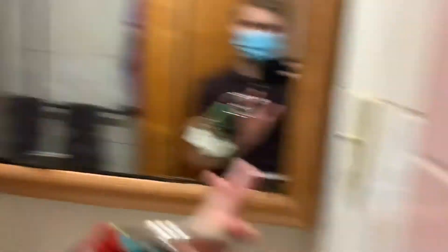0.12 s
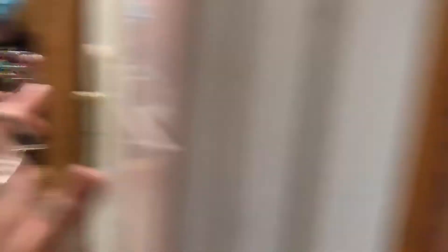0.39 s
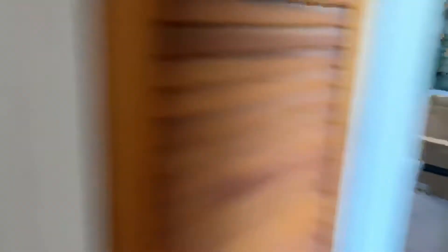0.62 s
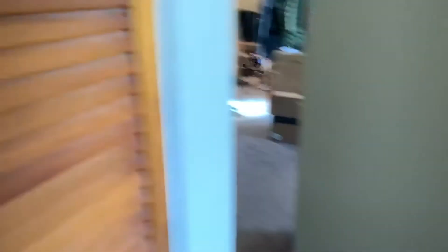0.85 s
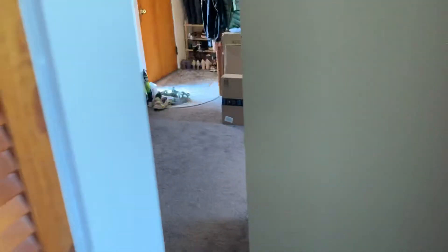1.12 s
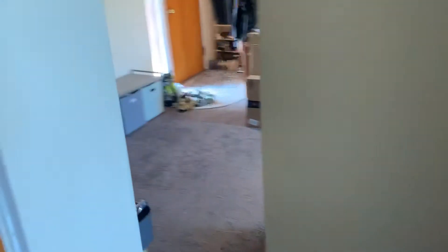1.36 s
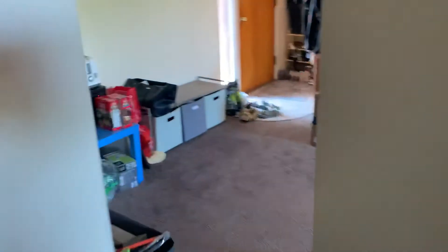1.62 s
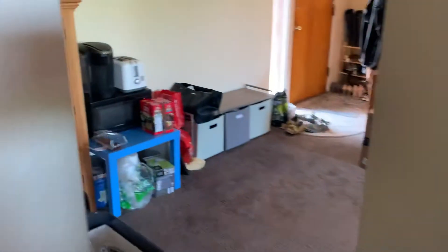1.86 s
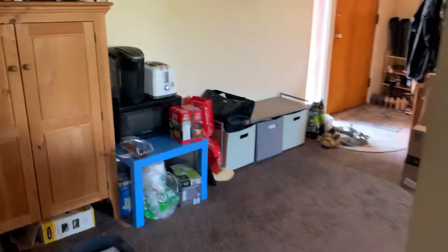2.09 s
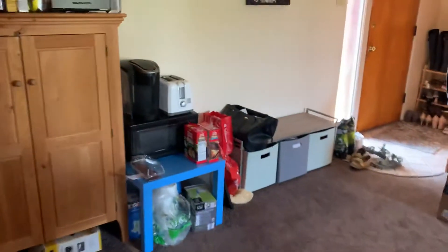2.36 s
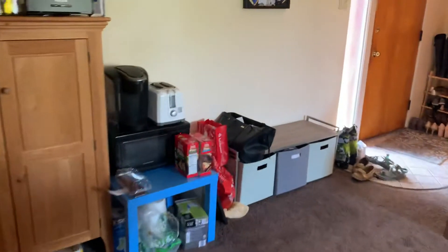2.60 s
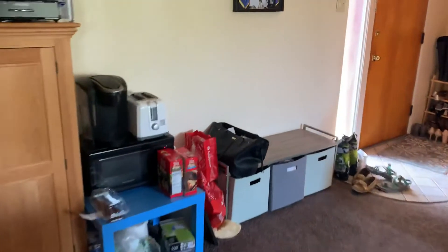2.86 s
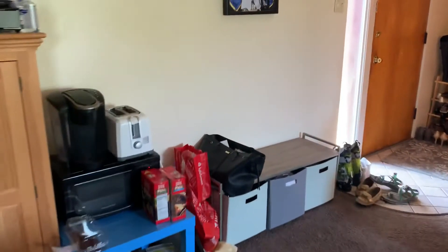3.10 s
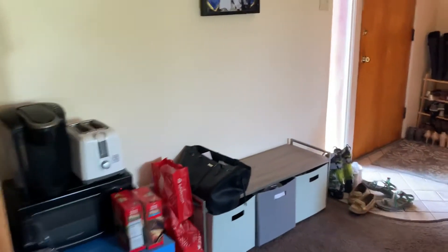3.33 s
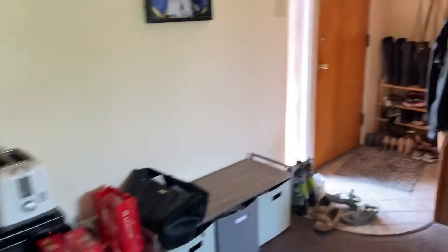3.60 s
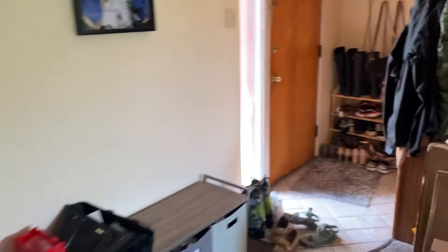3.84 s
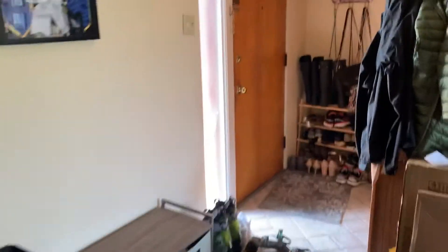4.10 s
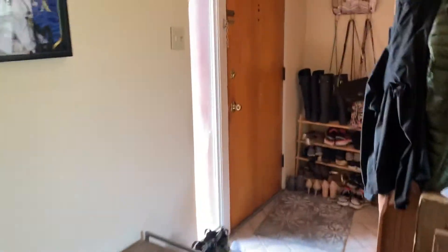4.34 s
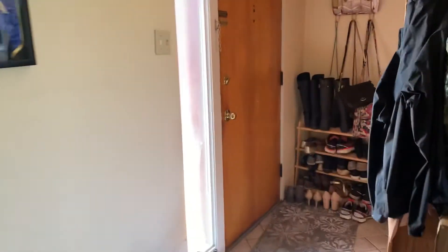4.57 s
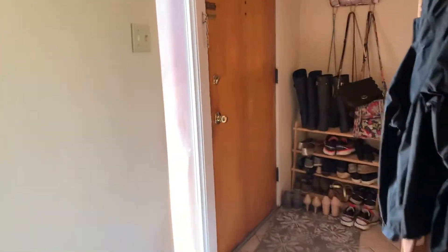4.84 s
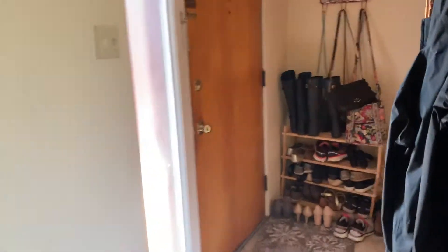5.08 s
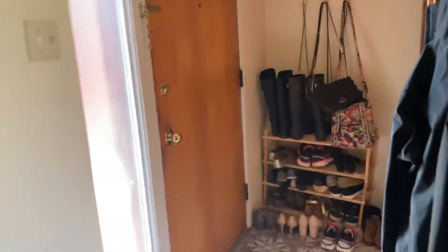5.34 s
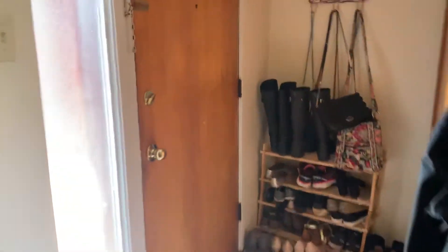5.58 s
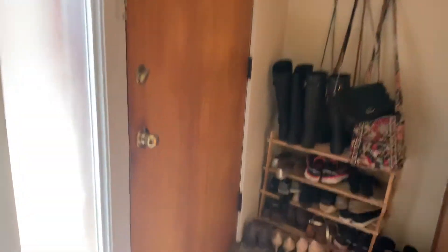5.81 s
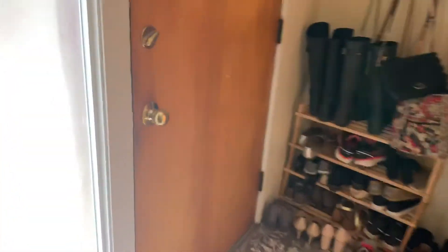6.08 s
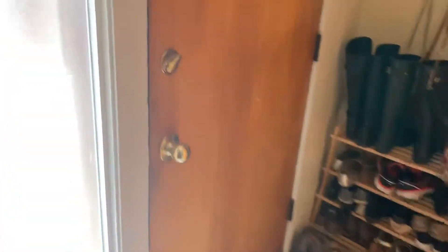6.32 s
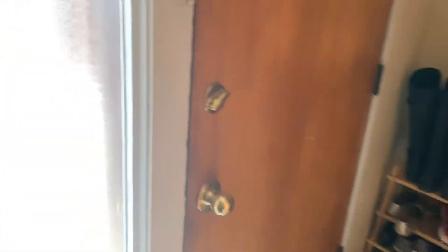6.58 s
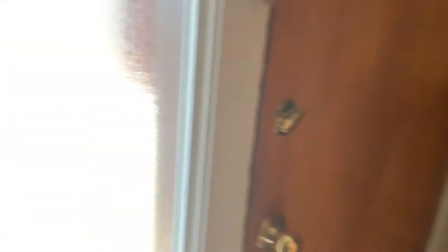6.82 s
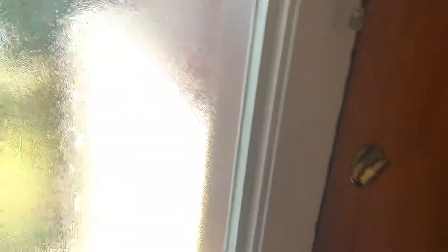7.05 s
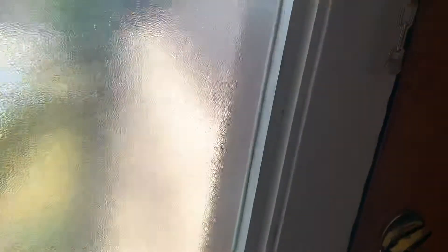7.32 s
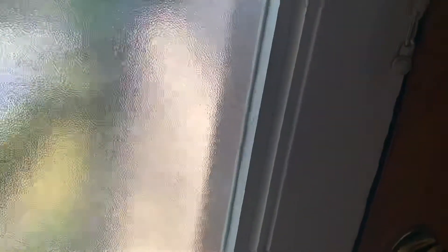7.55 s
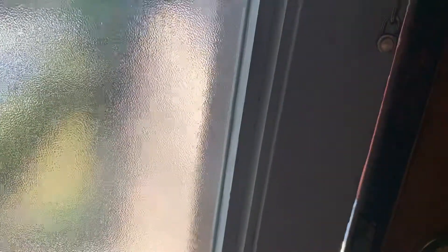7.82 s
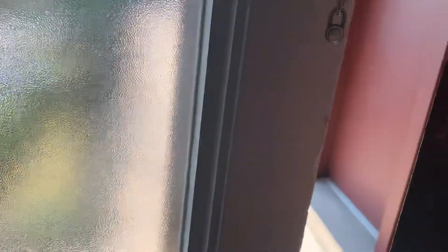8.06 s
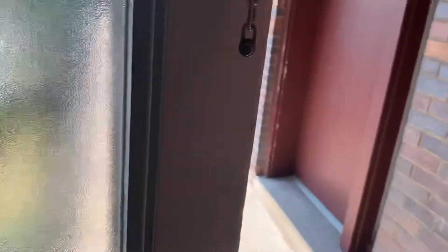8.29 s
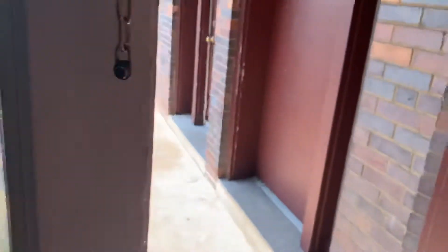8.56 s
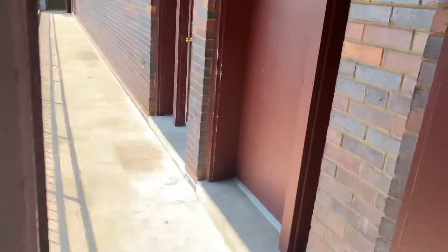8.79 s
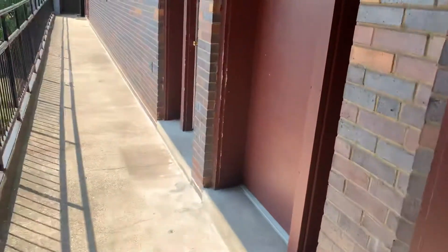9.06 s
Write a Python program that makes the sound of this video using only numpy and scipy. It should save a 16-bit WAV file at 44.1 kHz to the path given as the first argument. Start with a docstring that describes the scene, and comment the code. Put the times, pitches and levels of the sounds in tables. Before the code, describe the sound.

Someone carries keys through a small carpeted flat with short echoes. Thin, high clinks come thickly at first, with cloth crackle, loose shoe slaps and muffled steps over a low hum. Midway comes a loud, boomy bump on the phone, then finger rubs. The keys thin out; dull lock clacks, a brief door shudder and squeaky scrape lead to street noise outside and a last sharp slap.

```python
"""A bunch of keys clinks as someone carries it and a phone through a humming flat and opens the front door.
Keys are short ringing modes; clothes rustle as crackling noise; a finger knocks and rubs the phone's case.
Loose shoes slap as tinted noise bursts, and soles press softly into carpet over a low rumble. The lock clacks
as dull rings, the door shudders on a low tone and its seal scrapes. Last come street noise and a machine's tones."""
import sys
import numpy as np
from scipy import signal
from scipy.fft import rfft, irfft, next_fast_len
from scipy.io import wavfile
from scipy.ndimage import uniform_filter1d

SR = 44100
rng = np.random.default_rng(int(sys.argv[2]) if len(sys.argv) > 2 else 0)


def store_pcm(level_fs):
    """Save levels as 16-bit WAV."""
    pcm = np.round(np.clip(level_fs, -1, 1) * 32767).astype(np.int16)
    wavfile.write(sys.argv[1], SR, np.atleast_2d(pcm).T)


def voltage_ratio(level):
    """Linear amplitude factor for a level in decibels (scalar or array-like)."""
    return 10 ** (np.asarray(level, float) / 20)


N = 404397  # length in samples


def evened(x):
    """Scales a sound to rms 1, so that its level can be set afterwards."""
    return x / np.sqrt(np.mean(x ** 2) + 1e-20)


def read(points, hz):
    """Reads a table between its rows, with frequency on a log axis."""
    f, value = np.transpose(points)
    return np.interp(np.log(hz + 1), np.log(f + 1), value)


def level(rows, column=1):
    """Gain along a curve of dB over time, falling off just beyond its ends."""
    s, db = np.transpose(rows)[[0, column]]
    edge_s = 0.015
    times = [s[0] - edge_s, *s, s[-1] + edge_s]
    levels = [db[0] - 15, *db, db[-1] - 38]
    return voltage_ratio(np.interp(np.arange(N) / SR, times, levels, -200, -200))


def strokes(rows, rise_db_per_s, fall_db_per_s, column=2):
    """Gain of a row of gestures: each rises to its start, holds for its length and falls away."""
    start, length, db = np.transpose(rows)[[0, 1, column], :, None]
    t = np.arange(0, N + 64, 32) / SR  # a coarse clock is enough for the gain
    rise = (start - t) * rise_db_per_s
    fall = (t - start - length) * fall_db_per_s
    under_db = np.maximum(np.maximum(rise, fall), 0)
    total = np.sqrt((voltage_ratio(db - under_db) ** 2).sum(0))
    return np.interp(np.arange(N) / SR, t, total)


def add(mix, s, sound):
    """Lays a sound into the mix at s seconds."""
    part = mix[..., round(s * SR):][..., :sound.shape[-1]]
    part += sound[..., :part.shape[-1]]


def colour(x, db_at):
    """Filters a sound by a function that gives dB at each frequency."""
    size = next_fast_len(x.shape[-1] + 2048)
    gain = voltage_ratio(db_at(np.fft.rfftfreq(size, 1 / SR)))
    return irfft(rfft(x, size) * gain, size)[..., :x.shape[-1]]


def noise(tint, grain=0.0, per_s=600, patchy_db=0.0):
    """Coloured noise for both capsules, rms 1; lumps of a few ms make it grainy, patches shift its colour."""
    lumps = (rng.random(N) < per_s / SR) * np.minimum(rng.exponential(1, N), 2)
    lumps = uniform_filter1d(lumps, size=150)
    x = rng.standard_normal((2, N)) * (1 + grain * evened(lumps))
    x = colour(x, lambda hz: read(tint, hz))
    if patchy_db:
        z = signal.stft(x, nperseg=512)[2]
        patches = uniform_filter1d(rng.standard_normal(z.shape[1:]), size=5, axis=0)
        patches = uniform_filter1d(patches, size=8, axis=1)
        x = signal.istft(z * voltage_ratio(patchy_db * evened(patches)), nperseg=512)[1][:, :N]
    return evened(x)


def ring(modes, order=0, size=1500):
    """Struck modes; the softer the blow (order), the longer a mode swells before it dies."""
    hz, db, t60 = np.transpose(modes)[:, :, None]
    t = np.arange(size) / SR
    u = t * np.log(1000) / t60
    shape = (u / max(order, 1)) ** order * np.exp(order - u)
    return voltage_ratio(db) * shape * np.sin(2 * np.pi * hz * t)


def tone(hz, gain):
    """A sine that follows pitch and gain; the gain is its rms."""
    return np.sqrt(2) * gain * np.sin(2 * np.pi * np.cumsum(hz * np.ones(N)) / SR)


def shower(grains, per_s, spread_db):
    """Many small sounds, each grain repeating at random moments and sizes; rms 1."""
    out = np.zeros((2, N + grains.shape[1]))
    count = round(per_s * N / SR)
    for s, which, size, side in rng.random((count, 4)):
        loud = voltage_ratio(spread_db * min(-np.log(size), 3))
        grain = grains[int(which * len(grains))]
        add(out, s * N / SR, loud * grain * [[1], [np.sign(side - .5)]])
    return evened(out[:, :N])


# The ringing modes of a key, before each strike detunes them.
# Each row: pitch in Hz, level in dB against the other modes, time to fall by 60 dB in seconds.
KEY_MODES = [(6100, -43, 0.14), (6500, -19, 0.15), (6660, -10.5, 0.047), (10240, -5.5, 0.12),
             (10550, -5, 0.025), (11200, -7, 0.12), (11300, 4.5, 0.095), (11970, -4, 0.22), (14150, -5, .2),
             (14600, -17.5, 0.2), (14600, 7.5, 0.14), (15500, -7, 0.11)]


def strike(luck, hz=None):
    """One strike of key on key: a few modes, detuned as no two keys are alike, and a short rasp."""
    size = 9000
    t = np.arange(size) / SR
    modes = np.array(KEY_MODES)
    modes[:, 0] *= 1 + .025 * luck[:, 0]
    modes[:, 1] += 3.5 * luck[:, 2]
    modes[:, 2] *= np.exp(.25 * luck[:, 1])
    sound = ring(modes, size=size).sum(0)
    sound /= abs(sound).max()
    if hz:  # a single clink has a clear pitch of its own
        sound = voltage_ratio(6.0) * sound + voltage_ratio(-4.0) * ring([(hz, 0, .12)], size=size)[0]
    rasp = np.diff(rng.standard_normal(size + 2), 2) * voltage_ratio(-11.0 - 60 * t / 0.052)
    return (sound + rasp) * (1 - np.exp(-t / 0.00038))


# Each swing of the keys and clothes.
# Each row: start in seconds, length in seconds, jingle strength in dB, rustle strength in dB.
SWING_ROWS = [(0.0, 0.016, -34.5, -55), (.09, 0.01, -36.5, -54), (.2, 0.089, -37.5, -51),
              (.33, 0.12, -66, -59), (.52, 0.11, -57, -61.5), (.72, 0.085, -49.5, -65.5),
              (.99, 0.044, -51, -65), (1.1, 0.095, -47, -66), (1.22, 0.14, -39.5, -62),
              (1.45, .1, -41.5, -58), (1.615, 0.05, -34.5, -71), (1.73, 0.11, -40.5, -57),
              (1.92, 0.64, -48.5, -59.5), (2.26, .25, -38, -52.5), (2.57, 0.12, -46.5, -56.5),
              (2.73, 0.18, -37.5, -55), (2.96, 0.11, -53, -60.5), (3.1, 0.011, -44, -63.5),
              (3.21, 0.034, -48.5, -60.5), (3.38, .22, -60.5, -79), (3.75, 0.1, -57, -111),
              (4.09, 0.038, -56, -55), (4.28, 0.2, -65, -83), (4.41, 0.031, -58, -59.5),
              (4.47, 0.076, -49, -55), (4.57, 0.27, -42.5, -56), (4.9, .06, -48.5, -56.5),
              (5.08, 0.08, -40.5, -59.5), (5.35, 0.072, -83, -65.5), (5.43, 0.014, -46.5, -65),
              (5.6, 0.13, -59, -65.5), (5.97, 0.089, -80.5, -62), (6.13, .04, -82, -61),
              (6.26, 0.048, -57, -59.5), (6.48, 0.17, -62, -68.5), (6.78, .03, -55, -65.5),
              (6.88, 0.87, -94, -65), (7.19, 0.017, -66, -66)]


def swings(column):
    """One body movement sets both keys and cloth going: a very quick rise, then a slower fall."""
    return strokes(SWING_ROWS, rise_db_per_s=894, fall_db_per_s=214, column=column)


# Single key strikes that stand out.
# Each row: time in seconds, strength in dB, pitch in Hz of the clear ring added to the key's modes.
CLINK_ROWS = [(0.0818, -27.5, 10900), (0.19, -30, 11300), (0.2894, -33.5, 10340), (0.353, -43, 9700),
              (0.389, -35, 11800), (0.4425, -33, 10760), (0.5244, -27, 11280), (0.5725, -41, 11600),
              (0.7478, -30.5, 11360), (1.019, -52, 11300), (1.233, -30.5, 11420), (1.5186, -32, 15300),
              (1.6158, -30, 15500), (1.7345, -33, 15200), (1.8198, -39, 15300), (2.062, -38, 11000),
              (2.2518, -36, 15500), (2.2966, -30, 11100), (2.4364, -50, 15300), (2.4896, -29, 15000),
              (2.6287, -34.5, 11500), (2.68, -29.5, 15300), (2.7498, -24, 11200), (2.8377, -25, 11170),
              (3.0999, -38, 15200), (3.22, -45.5, 11200), (3.307, -57, 11200), (3.38, -39.5, 15500),
              (3.595, -49.5, 15500), (3.7488, -41.5, 11070), (3.827, -46, 9750), (4.0887, -37, 9750),
              (4.2747, -50, 11600), (4.4633, -36, 9890), (4.58, -36, 11000), (4.6443, -33, 11300),
              (4.683, -27, 11600), (4.908, -42, 12000), (5.04, -45.5, 6700), (5.082, -36, 11600),
              (5.237, -50.5, 10300), (5.441, -47, 12600), (5.7103, -41.5, 15600), (5.9928, -48.5, 11050),
              (6.2282, -49, 15500), (6.2751, -49.5, 11200), (6.4732, -44, 15500), (6.5967, -44.5, 14800),
              (6.779, -46.5, 10880), (6.937, -36.5, 15100), (6.9846, -42.5, 11650), (7.179, -40, 15500),
              (7.197, -45.5, 11000), (7.635, -48.5, 11800), (7.7094, -38.5, 11560), (7.9316, -46, 14500),
              (8.3978, -39, 11800)]
# The colour of keys rubbing on their ring. Each row: frequency in Hz, relative level in dB.
CHAFE_TINT = [(1500, -46.5), (4500, -10), (6500, 9), (10000, 9.5), (16000, 0)]


def keys():
    """Single strikes, and a shower of small ones with rubbing noise while the bunch swings."""
    out = np.zeros((2, N))
    lucks = rng.standard_normal((len(CLINK_ROWS), len(KEY_MODES), 3))
    for (s, db, hz), luck in zip(CLINK_ROWS, lucks):
        side = [[1], [np.sign(luck[0, 0])]]
        add(out, s, voltage_ratio(db) * strike(luck, hz) * side)
    lucks = rng.standard_normal((40, len(KEY_MODES), 3))
    small = np.array([strike(luck)[:4000] for luck in lucks])
    jingle = shower(small, per_s=90, spread_db=-1.0)
    chafe = noise(CHAFE_TINT, grain=1.5, per_s=27, patchy_db=6.0)
    return out + swings(column=2) * (voltage_ratio(1.5) * jingle + voltage_ratio(-12.5) * chafe)


# The colour of rustling cloth. Each row: frequency in Hz, relative level in dB.
RUSTLE_TINT = [(600, -17), (1300, -0.5), (2200, 1), (4000, 1.5), (7000, -3.5), (12000, -6.5), (16000, 1)]


def clothes():
    """Fabric hiss with crackles of a few cycles, each of its own pitch."""
    hz = np.geomspace(1200, 7000, 30)
    crackles = ring(np.c_[hz, read(RUSTLE_TINT, hz), 4.0 / hz], order=1, size=500)
    hiss = noise(RUSTLE_TINT, grain=.6, per_s=200, patchy_db=1.8)
    sway = swings(column=3) + voltage_ratio(-73.5)  # the clothes still whisper between swings
    return sway * (voltage_ratio(-2.0) * hiss + voltage_ratio(-17.0) * shower(crackles, per_s=150, spread_db=0.5))


# Knocks on the phone's case. Each row: time in seconds, level in dB, bass in dB against it,
# snap in dB against it, sign of the push.
KNOCK_ROWS = [(5.237, -8.5, 2.5, -7.5, 1), (5.545, -42.5, -11, -27, 1), (5.599, -47.5, -10, -20, 1),
              (5.689, -21.5, -8, -22.5, 1), (5.714, -44.5, -19, -30, 1), (5.77, -41.5, -26, -9, 1),
              (5.984, -29.5, -20, -22, 1), (6.031, -33.5, -21, -29, 1)]
# A bending wave that slows: first Hz, last Hz, glide in seconds, time to fall by 60 dB in seconds.
CASE_BEND = (225, 62, .008, .065)
# The main modes of the case, and those of the snap.
# Each row: pitch in Hz, level in dB, time to fall by 60 dB in seconds.
CASE_MODES = [(550, 7.5, 0.0066), (740, -4.5, 0.0045), (265.5, -4, 0.015)]
SNAP_MODES = [(1190, -3.5, 0.0026), (2190, 3.5, 0.0035), (4100, -2, 0.0015), (6200, -18, 0.0065)]


def knocks():
    """The snap comes first, then the case's main modes, then its bass; all reach the left channel later."""
    body, snap, t = np.zeros(N), np.zeros(N), np.arange(4000) / SR
    first_hz, last_hz, glide, t60 = CASE_BEND
    turns = np.cumsum(last_hz + (first_hz - last_hz) * np.exp(-t / glide)) / SR
    bass = voltage_ratio(-60 * t / t60) * (1 - np.exp(-t / 0.00076)) * np.sin(2 * np.pi * turns)
    for s, db, bass_db, snap_db, sign in KNOCK_ROWS:
        push = voltage_ratio(db) * sign
        add(snap, s + 0.00135, push * voltage_ratio(snap_db) * ring(SNAP_MODES, order=1).sum(0))
        add(body, s + .0017, push * ring(CASE_MODES, order=2).sum(0))
        add(body, s + .0055, push * voltage_ratio(bass_db) * bass)
    left = np.roll(body, 13) + voltage_ratio(5.5) * np.roll(snap, 5)  # lags in samples
    return np.array([left, body + snap])


# Dull noise on the case: first a faint blur around the hard knock, then strokes of rubbing fingers.
# Each row: start in seconds, length in seconds, level in dB.
CASE_NOISE_ROWS = [(5.22, 0.045, -46.5), (5.3, 0.017, -56.5), (5.355, .055, -51.5), (5.44, 0.024, -47.5),
                   (5.49, 0.059, -51), (5.6, 0.013, -53), (5.66, 0.031, -56), (5.71, 0.018, -50),
                   (5.77, 0.032, -53.5), (5.86, 0.024, -66), (5.92, 0.078, -54), (6.0, 0.053, -51),
                   (6.135, 0.023, -47.5), (6.27, 0.011, -45), (6.45, .1, -61), (6.58, 0.193, -71.5)]
# The colour of that noise. Each row: frequency in Hz, relative level in dB.
CASE_NOISE_TINT = [(80, 4.5), (160, 7), (330, 2.5), (540, 3), (800, -11.5), (1100, -14), (3000, -24)]


def case_noise():
    """Dull, slightly grainy noise: a faint blur around the hard knock, then strokes of rubbing fingers."""
    gain = strokes(CASE_NOISE_ROWS, rise_db_per_s=707, fall_db_per_s=411)
    return gain * noise(CASE_NOISE_TINT, grain=0.21, per_s=27)


# Shoe slaps and hard scuffs. Each row: time in seconds, strength in dB, brightness in dB per octave,
# time to fall by 60 dB in seconds, resonance in Hz.
SLAP_ROWS = [(0.349, -38.5, 8.5, 0.038, 2340), (0.403, -40.5, 6.5, 0.042, 2640),
             (0.497, -47, 6, 0.071, 3820), (0.678, -48, 1.5, 0.064, 4100),
             (0.838, -53.5, -13.5, 0.16, 1230), (2.298, -34, 4.5, 0.14, 1360),
             (2.497, -52, -0.5, 0.35, 3680), (2.748, -43.5, 3, 0.03, 3150), (2.822, -44.5, 2, 0.095, 4000),
             (2.883, -42.5, 0, 0.1, 4500), (2.94, -41, -2, 0.059, 3770), (3.868, -54.5, -10, 0.022, 1620),
             (4.086, -38, 3.5, 0.09, 1860), (4.465, -57, 7.5, 0.18, 3940), (4.927, -48.5, 10, 0.045, 2180),
             (5.273, -55, 7, 0.038, 4760), (5.438, -50, 12.5, 0.031, 2980), (5.792, -47, -1, 0.034, 3160),
             (6.136, -36, -6.5, 0.07, 1556), (6.274, -39, 8, 0.043, 2050), (7.304, -42.5, -5.5, 0.12, 1070),
             (7.414, -45.5, -1.5, 0.21, 2240), (7.444, -36, -14, 0.12, 1300),
             (7.583, -36.5, -11, 0.052, 1110), (8.399, -29, -1.5, 0.13, 2820), (8.53, -40, -15, 0.034, 600)]


def slaps():
    """A burst of noise, tilted bright or dull, with a quick start and one resonance, which the first contact rings."""
    out, t = np.zeros((2, N)), np.arange(12000) / SR
    puffs = rng.standard_normal((len(SLAP_ROWS), 2, len(t)))
    for (s, db, tilt_db, t60, peak_hz), puff in zip(SLAP_ROWS, puffs):
        def tint(hz):
            tilt = tilt_db * np.log2((hz + 400) / 2400)
            hump = 7.5 * np.exp(-(np.log2((hz + 1) / peak_hz) / 0.38) ** 2)
            return tilt - 20.0 * (hz < 500) + hump

        fade = voltage_ratio(db - 60 * t / t60) * (1 - np.exp(-t / 0.0035))
        add(out, s, fade * colour(puff, tint))
        contact = ring([(peak_hz, 0, .012), (1.599 * peak_hz, -4, .008)], order=1).sum(0)
        add(out, s, voltage_ratio(db - 8.0) * contact)
    return out


# The lock clacking in the door.
# Each row: time in seconds, strength in dB, pitch in Hz, rattle in dB against it, rattle pitch in Hz.
THUD_ROWS = [(6.8, -28, 189.5, -25, 425), (6.83, -36, 227, -12, 508), (6.87, -45.5, 173, 2.5, 815),
             (6.883, -40, 195, -9, 513), (6.93, -50.5, 168, 9.5, 516), (7.319, -38, 199, -9, 397),
             (7.403, -40.5, 233, -5, 423), (7.448, -32, 196.6, -3.5, 1280), (7.524, -35, 224, -15, 460),
             (7.552, -40, 217, 2.5, 450)]


def thuds():
    """A dull ring of the door, with a rattle of loose parts."""
    out, t, t60 = np.zeros((2, N)), np.arange(9000) / SR, 0.053  # t60 in seconds
    puffs = rng.standard_normal((len(THUD_ROWS), 2, len(t)))
    for (s, db, hz, rattle_db, rattle_hz), puff in zip(THUD_ROWS, puffs):
        rattle = evened(colour(puff, lambda f: -14.0 * abs(np.log2((f + 20) / rattle_hz))))
        rattle_gain = voltage_ratio(rattle_db - 60 * t / t60) * (1 - np.exp(-t / 0.00227))
        modes = [(hz, 0, 0.53 * t60), (1.64 * hz, -4, 0.42 * t60), (rattle_hz, -8, 0.4 * t60)]
        body = ring(modes, order=1, size=len(t)).sum(0)
        add(out, s, voltage_ratio(db) * (body + rattle_gain * rattle))
    return out


# The door leaf shudders as it comes unstuck. Each row: time in seconds, pitch in Hz, level in dB.
SHUDDER_CURVE = [(7.49, 75.9, -64.5), (7.525, 78, -23.5), (7.582, 71.8, -24), (7.622, 77, -43.5),
                 (7.654, 80, -29), (7.68, 77.6, -68)]


def shudder():
    """The leaf's lowest mode and its octave, with opposite signs in the two capsules."""
    s, hz, db = np.transpose(SHUDDER_CURVE)
    hz = np.interp(np.arange(N) / SR, s, hz)
    gain = level(SHUDDER_CURVE, column=2)
    return (tone(hz, gain) + tone(2 * hz, voltage_ratio(-15.5) * gain)) * [[1], [-1]]


# The door seal scrapes the frame. Each row: time in seconds, level in dB, treble against it in dB.
SCRAPE_CURVE = [(7.59, -47.5, 2.5), (7.6, -44, -9.5), (7.678, -47, -18), (7.712, -37, -1.5),
                (7.732, -39, -4.5), (7.745, -33, -2.5), (7.838, -57.5, -10), (7.86, -55, -8)]
# The colours of its low and its high part. Each row: frequency in Hz, relative level in dB.
SCRAPE_TINT = [(300, -2.5), (800, 4), (1100, 0.5), (1500, 7.5), (1900, -1.5), (2400, -3.5), (4000, -67)]
SQUEAK_TINT = [(1500, -20), (2400, -10.5), (3000, -5.5), (3400, -9.5), (3800, -7), (5000, -17),
               (9000, -23.5), (16000, -25)]


def scrape():
    """Rubber judders along the frame through its low and high resonances, as two grainy noises."""
    s, db, treble_db = np.transpose(SCRAPE_CURVE)
    treble = voltage_ratio(np.interp(np.arange(N) / SR, s, treble_db))
    low = noise(SCRAPE_TINT, grain=0.26, per_s=150, patchy_db=1.5)
    high = noise(SQUEAK_TINT, grain=0.4, per_s=230, patchy_db=2.0)
    return level(SCRAPE_CURVE) * (low + treble * high)


# Soft soles pressing into carpet, and the floor's answer.
# Each row: start in seconds, length in seconds, sole level in dB, floor level in dB.
STEP_ROWS = [(.43, .05, -72.5, -80), (.62, 0.049, -65.5, -55), (.84, 0.042, -64.5, -69),
             (1.25, 0.088, -91, -67.5), (1.46, 0.14, -66, -66.5), (2.0, 0.11, -58, -55.5),
             (2.29, 0.076, -57.5, -57.5), (2.63, 0.042, -69, -64), (2.86, 0.059, -68, -62.5),
             (3.11, 0.11, -77, -57.5), (3.5, 0.13, -65, -54.5), (3.9, 0.089, -74.5, -62),
             (4.19, 0.14, -60.5, -49.5), (4.48, 0.036, -56, -60), (4.78, 0.062, -54, -59.5),
             (4.96, 0.017, -59, -49.5), (5.12, .06, -68, -53)]
# Low rumble: floor and house under the steps, then from 5.2 s the phone being handled.
# Each row: time in seconds, level in dB.
RUMBLE_CURVE = [(0.0, -53), (.19, -68), (.3, -61.5), (1.6, -58), (1.8, -57), (3.2, -56), (4.1, -58.5),
                (5.2, -58), (5.5, -47.5), (5.95, -56.5), (6.33, -50), (7.03, -54), (7.42, -47),
                (7.7, -44.5), (7.85, -50), (8.15, -57), (8.3, -61), (8.9, -53.5), (9.17, -59.5)]
# The colours of sole and rumble. Each row: frequency in Hz, relative level in dB.
TREAD_TINT = [(100, -9.5), (230, 6), (400, -6.5), (800, -14.5), (1500, -16), (3000, -42)]
RUMBLE_TINT = [(15, -10.5), (35, -14), (60, -2), (90, -1), (140, -11.5), (250, -26), (500, -51.5)]


def footfalls_and_rumble():
    """Soles on carpet, over a low rumble: floor and house under the steps, then the phone being handled."""
    sole = strokes(STEP_ROWS, rise_db_per_s=311, fall_db_per_s=150)
    floor = strokes(STEP_ROWS, rise_db_per_s=311, fall_db_per_s=150, column=3)
    tread = noise(TREAD_TINT, grain=0.55, per_s=90, patchy_db=6.0)
    rumble = noise(RUMBLE_TINT)
    return sole * tread + np.hypot(floor, level(RUMBLE_CURVE)) * rumble


# Appliance hum, swelling as the walker crosses its standing wave.
# Each row: time in seconds, level in dB; the first dip of the throb, at 8.77 s, is included.
HUM_CURVE = [(0.0, -87), (0.36, -77), (0.5, -54.5), (0.78, -50), (2.27, -41.5), (2.79, -37), (3.63, -42),
             (4.09, -48.5), (4.31, -56), (4.42, -74), (4.54, -55), (4.81, -50), (5.17, -48), (5.37, -52),
             (5.536, -56), (5.7, -66), (6.11, -45), (6.48, -40.5), (7.39, -38.5), (8.0, -40.5), (8.6, -38),
             (8.72, -35.5), (8.77, -47), (8.92, -39.5), (9.17, -38)]
# Its half-speed shaft tone, near the appliance only. Each row: time in seconds, level in dB.
SHAFT_CURVE = [(0, -61.5), (.8, -54), (1.8, -54), (3.1, -52.5), (3.6, -76)]


def hum():
    """The appliance tone and its half; the full tone throbs near the end, as if beating with the machine outside."""
    t, hum_hz = np.arange(N) / SR, 115.7
    throb_from_s, throb_hz, crest_s = 8.85, 13.5, 9.002
    depth = np.clip((t - throb_from_s) / 0.049, 0, 1)
    throb = 1 + depth * np.cos(2 * np.pi * throb_hz * (t - crest_s))
    return tone(hum_hz, throb * level(HUM_CURVE)) + tone(hum_hz / 2, level(SHAFT_CURVE))


# Street noise through the widening gap. Each row: time in seconds, level in dB.
STREET_CURVE = [(7.8, -78), (7.872, -56), (7.932, -50.5), (8.036, -50.5), (8.4, -44), (9.17, -43)]
# The colour of the traffic. Each row: frequency in Hz, relative level in dB.
STREET_TINT = [(60, 10), (150, 12), (400, -1.5), (1000, -1.5), (2000, -5.5), (4000, -14), (8000, -12.5),
               (16000, -18.5)]
# A machine outside. Each row: middle pitch in Hz, level in dB half a second before the end.
MOTOR_TONES = [(51, -54), (102, -49), (128, -61), (153, -77), (204, -56)]


def street():
    """Traffic wash and the wavering tones of a machine, both let in by the gap."""
    t, gap = np.arange(N) / SR, level(STREET_CURVE)
    waver = uniform_filter1d(rng.standard_normal((len(MOTOR_TONES), N)), size=3000)
    drift = 1.176 * np.cumsum(evened(waver), 1) / SR  # the pitches stray by about 1.2 Hz
    tones = sum(voltage_ratio(db) * np.sin(2 * np.pi * (hz * t + d)) for (hz, db), d in zip(MOTOR_TONES, drift))
    wash = noise(STREET_TINT, grain=0.067, patchy_db=1.5)
    return gap * (wash + np.sqrt(2) * tones / gap[-SR // 2])


# The colour of the room's own quiet noise. Each row: frequency in Hz, relative level in dB.
ROOM_TINT = [(100, 15.5), (200, 10), (500, 1.5), (1500, 2), (4000, -4), (9000, -24), (16000, -20)]


def room():
    """A steady, faint noise whose colour shifts in patches."""
    return voltage_ratio(-71) * noise(ROOM_TINT, patchy_db=5.0)


# How long echoes last. Each row: frequency in Hz, time to fall by 60 dB in seconds.
HALL_T60 = [(250, 0.54), (1000, 0.25), (4000, 0.37), (12000, 0.074)]


def hall(x):
    """Echoes: sparse taps of random sign, each band dying at its own speed."""
    taps = rng.choice([-1., 1.], (2, SR // 2)) * (rng.random((2, SR // 2)) < .05)
    taps[:, :150] = 0  # the first echo needs time to return
    hz, t, z = signal.stft(taps, SR, nperseg=256)
    fade = voltage_ratio(-60 * t / read(HALL_T60, hz)[:, None])
    tail = signal.istft(z * fade, SR, nperseg=256)[1]
    return signal.fftconvolve(x, tail / np.linalg.norm(tail[0]), axes=1)[:, :N]


# The phone's forward and crosswise capsules, each with its own notches, and the crosswise one's bass.
# Each row: frequency in Hz, gain in dB.
FORWARD_GAIN = [(3000, 0), (5800, -4), (6800, -2), (7600, -7.5), (8000, -20), (9200, -17.5), (9600, -6),
                (11300, -6), (12300, -12), (12800, -48), (13900, -33), (14400, -18.5), (15300, -6),
                (15900, -16.5), (16400, -60.5)]
CROSSWISE_GAIN = [(300, -10), (700, -2), (1500, 0), (6000, -3.5), (9000, -4.5), (10200, -9), (10900, -32),
                  (12000, -8.5), (14700, -16), (15700, -3.5), (16500, -45.5)]
CROSSWISE_BASS_GAIN = [(60, -12), (115, -15)]


def capsules(air):
    """Airborne sound reaches both capsules, whose sum and difference give left and right."""
    forward = colour(air[0], lambda hz: read(FORWARD_GAIN, hz))
    crosswise = colour(air[1], lambda hz: read([*CROSSWISE_BASS_GAIN, *CROSSWISE_GAIN], hz))
    # it senses the gradient: a quarter cycle ahead
    crosswise = -signal.hilbert(crosswise, next_fast_len(N))[:N].imag
    return np.array([forward + crosswise, forward - crosswise])


def scene():
    """All layers but the knocks pass the capsules; knocks on the case are added directly."""
    hits = keys() + slaps() + thuds()
    air = hits + voltage_ratio(-7.5) * hall(hits)
    air += clothes() + case_noise() + shudder() + scrape()
    air += footfalls_and_rumble() + hum() + street() + room()
    return capsules(air) + knocks()


def band_limit(x):
    """A steep low-pass at the top of the band."""
    return signal.sosfilt(signal.butter(12, 17000, fs=SR, output="sos"), x)


def record(dry):
    """The finished mix as it leaves the phone."""
    return band_limit(dry)


dry = scene()
out = record(dry)
store_pcm(out)
```